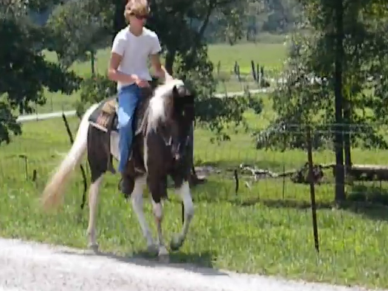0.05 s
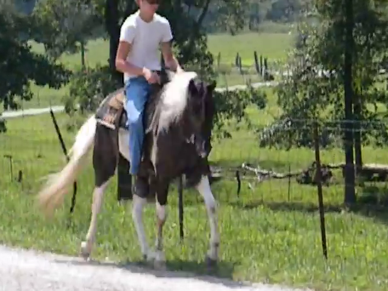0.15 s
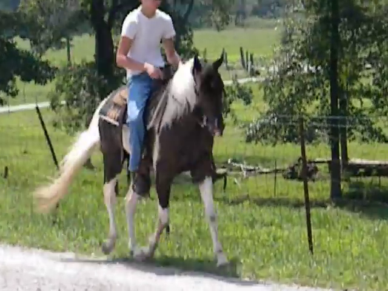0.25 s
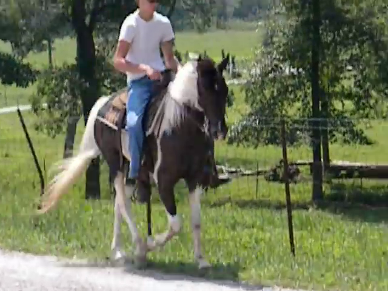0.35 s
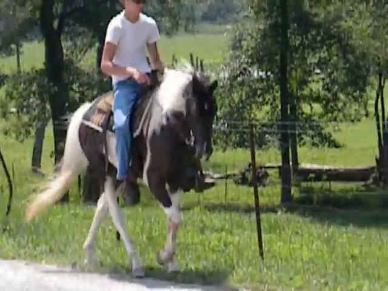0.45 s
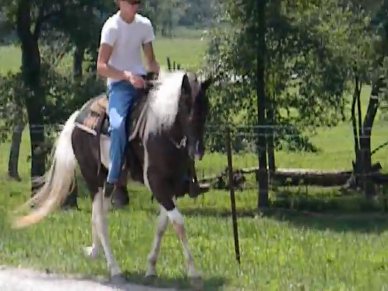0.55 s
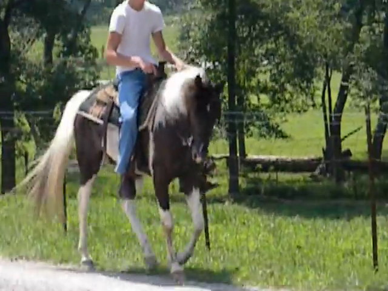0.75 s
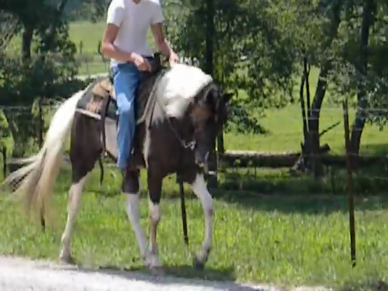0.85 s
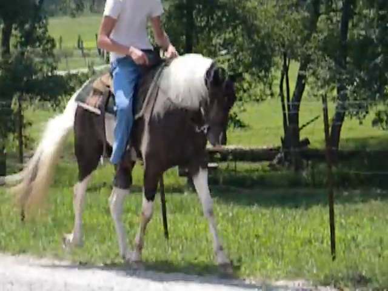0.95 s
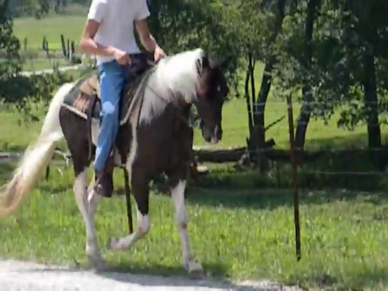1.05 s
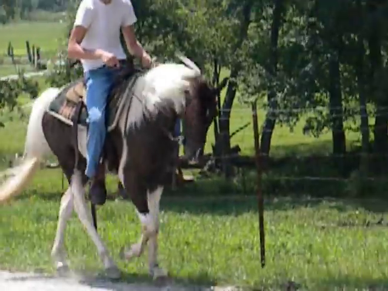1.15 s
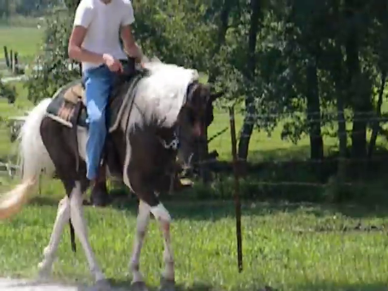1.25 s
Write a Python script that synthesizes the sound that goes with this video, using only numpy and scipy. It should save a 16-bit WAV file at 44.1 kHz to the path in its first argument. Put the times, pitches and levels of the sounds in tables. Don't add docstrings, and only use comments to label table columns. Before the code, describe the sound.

Outdoors, small hoof taps on stones lead into a sharp overloaded plastic crack against the camera casing, then the sound ducks briefly and soft hoof crunches continue under light wind hiss and faint motor hum.

```python
import sys
import numpy as np
from scipy import signal
from scipy.fft import rfft, irfft, next_fast_len
from scipy.io import wavfile
from scipy.ndimage import uniform_filter1d, map_coordinates

SR = 44100
rng = np.random.default_rng(int(sys.argv[2]) if len(sys.argv) > 2 else 0)


def unload_wav(signal):
    wavfile.write(
        sys.argv[1],
        SR,
        np.round(np.clip(np.atleast_2d(signal).T, -1, 1) * 32767).astype(np.int16),
    )


def undo_db(level):
    steps = np.asarray(level, float) / 20
    return 10 ** steps


N = 57330


def unit(x):
    return x / np.sqrt(np.mean(x ** 2) + 1e-20)


def wobble(rate):
    knots = rng.standard_normal(int(N * 40 / SR) + 9)
    return map_coordinates(knots, [np.arange(N) * min(rate, 40) / SR])


def filtered(x, response):
    m = next_fast_len(N + 8192)
    return irfft(rfft(x, m) * response(np.fft.rfftfreq(m, 1 / SR)), m)[..., :N]


def above(x, cut_hz):
    def response(hz):
        section = 1j * hz / (cut_hz + 1j * hz * 1.612 - hz ** 2 / cut_hz) * 1j * hz / cut_hz
        return section ** 2
    return filtered(x, response)


def rush(points, patchy_db):
    z = signal.stft(rng.standard_normal(N), nperseg=512)[2]
    patches = uniform_filter1d(rng.standard_normal(z.shape), size=6, axis=0)
    patches = uniform_filter1d(patches, size=8, axis=1)
    noise = signal.istft(z * undo_db(patchy_db * unit(patches)), nperseg=512)[1][:N]
    f, db = np.transpose(points)
    return unit(filtered(noise, lambda hz: undo_db(np.interp(np.log(hz + 1), np.log(f + 1), db))))


def ring(s, db, hz, t60, attack_s):
    s, db, hz, t60 = [np.asarray(v, float)[:, None] for v in (s, db, hz, t60)]
    at = np.ceil(s * SR).astype(int) + np.arange(SR // 12)
    t = at / SR - s
    decay = undo_db(db - 60 * t / t60)
    wave = decay * np.sin(2 * np.pi * hz * t) * (1 - np.exp(-t / attack_s))
    return np.bincount(at.ravel(), wave.ravel(), N + SR)[:N]


def wind():
    # f/Hz, level per Hz/dB
    leaves = [(150, -37), (260, -2.5), (466, -7), (910, -9.5), (989, -7), (1080, -8), (1260, -8),
              (3420, -9), (4500, -15.5), (5850, -59), (9900, -120)]
    # f/Hz, level per Hz/dB
    rumble = [(12, -37), (20, -15.5), (32, -28.5), (118, -9), (150, -5), (200, -42), (330, -120)]
    patchy_db = .6
    gusts_db = .35 * (wobble(1.1) + wobble(14))
    hiss_points = [(110, -29.5), (170, leaves[1][1])] + list(leaves[1:])
    hiss = undo_db(-41.5 + gusts_db) * rush(hiss_points, patchy_db)
    return hiss + undo_db(-57.5 + 1.1 * wobble(4.9)) * rush(rumble, patchy_db)


def motor():
    # t/s, level/dB
    load = [(0, -3.5), (.12, -4.5), (.25, -7.5), (.4, -1), (.62, -3), (.85, -1.5), (1.0, -1.5), (1.05, -2),
            (1.3, -1.5)]
    hum_hz, hum_db, overtone_db, skirt_db = 194.5, -37.5, -22, -18
    turns_per_s, turn_peak_s, turn_depth = 10.3, .832, 0.24
    t = np.arange(N) / SR
    phase = 2 * np.pi * np.cumsum(hum_hz + 0.14 * wobble(5.2)) / SR
    turn = 1 + turn_depth * np.cos(2 * np.pi * turns_per_s * (t - turn_peak_s))
    swell = turn * undo_db(1.14 * wobble(25))
    tone = np.sin(phase) + undo_db(overtone_db) * np.sin(2 * phase)
    skirt = unit(filtered(rng.standard_normal(N), lambda hz: 1 / (1 + ((hz - hum_hz) / 25) ** 2)))
    level = undo_db(hum_db + np.interp(t, *np.transpose(load)))
    return level * (np.sqrt(2) * swell * tone + undo_db(skirt_db) * skirt)


def hooves():
    # t/s, peak level/dB, f/Hz, t60/s
    taps = [(.1092, -15, 1100, 0.0051), (0.1454, -14.5, 730, 0.0087), (.146, -20, 1180, 0.012),
            (0.145, -20, 1800, 0.0025), (.147, -17.5, 3385, 0.011), (.2125, -14.5, 1514, .005),
            (0.2126, -30.5, 2690, .02), (.318, -28.5, 857, 0.019), (0.5347, -16.5, 2670, 0.0041),
            (.5395, -22, 2220, 0.0061), (.683, -30.5, 337, .07), (.99, -30.5, 597, 0.026),
            (1.063, -21.5, 328, 0.009), (1.189, -28, 458, 0.022), (1.2845, -14, 2300, 0.0016),
            (1.212, -26.5, 880, 0.016), (0.321, -33.5, 445, 0.039), (.47, -51.5, 256, .04),
            (1.235, -41.5, 536, 0.24), (.8272, -24.5, 2950, .009), (1.189, -31, 810, 0.033),
            (1.203, -31, 1065, 0.073)]
    # start t/s, length/s, level/dB, centre f/Hz
    crunches = [(0.1, 0.026, -40, 1730), (0.13, 0.0082, -44.5, 2600), (0.203, 0.067, -36.5, 1900),
                (0.305, .03, -44, 2184), (0.447, 0.039, -52, 1740), (0.67, 0.028, -39.5, 1900),
                (0.825, .016, -38.5, 2450), (0.852, 0.017, -35, 2200), (0.862, 0.049, -45, 2720),
                (0.973, 0.016, -44, 2870), (1.187, 0.017, -35, 1800), (1.203, .022, -38.5, 1600),
                (1.284, 0.0068, -30.5, 3140), (0.537, 0.0046, -34.5, 2260)]
    grit_db, width_octaves, rise = 5, .75, .2
    out = ring(*np.transpose(taps), 0.00017)
    t = np.arange(N) / SR
    for start, length, db, centre_hz in crunches:
        grains = unit(uniform_filter1d(rng.standard_normal(N), size=40))
        grit = rng.standard_normal(N) * undo_db(grit_db * grains)
        push = np.interp((t - start) / length, [0, rise, .7, 1], [0, 1, .7, 0])
        burst = filtered(
            grit * push,
            lambda hz: np.exp(-.5 * (np.log2((hz + 1) / centre_hz) / width_octaves) ** 2))
        out = out + undo_db(db) * burst * np.sqrt(length * SR / np.sum(burst ** 2))
    return above(out, 160)


def snap():
    contact_s = [
        .2346,
        .23648,
        .24024,
        .2465,
    ]
    contact_db = [
        -0.5,
        -16,
        -24,
        -38.5,
    ]
    mode_hz = [1110, 1290, 1500, 1760, 2130, 2640, 2820, 3210, 3500]
    # level/dB, t60/s
    modes = [(-0.5, 0.014), (3.5, .012), (-4.5, .011), (-12.5, 0.0048), (-7.5, 0.019), (0, 0.019),
             (-4, 0.011), (-10, 0.031), (-9, 0.023)]
    rows = []
    for s, db in zip(contact_s, contact_db):
        for hz, (level, t60) in zip(mode_hz, modes):
            rows.append((s, db + level, hz, t60))
    casing = above(ring(*np.transpose(rows), attack_s=0.001), 1124)
    thud = ring([contact_s[0]], [-28.5], [380], [.02], attack_s=.0012)
    return casing + above(thud, 260)


def scene():
    return (wind() + motor() + hooves() + undo_db(6.5) * snap())[None]


def top_cut(x):
    return signal.sosfilt(signal.butter(12, 4740, fs=SR, output="sos"), x)


def record(dry):
    # t/s, level/dB
    gain = [(0, 2), (.055, -2), (.075, -3.5), (.1, 0.5), (.2, 0.5), (.236, 0.5), (.243, -8.5), (.285, -5),
            (.32, -0.5), (.42, 0), (1.3, -0.5)]
    top_hz, edge_hz = 4102, 120
    overload_level, hardness, offset = 1.0, 30, -.0039

    def narrow(hz):
        slope = np.clip((hz - top_hz) / edge_hz, -40, 40)
        return 1 / (1 + np.exp(slope)) * (hz < 4600)

    s, db = np.transpose(gain)
    x = dry * undo_db(np.interp(np.arange(N) / SR, s, db))
    x = filtered(x, narrow)
    x = x / (1 + np.abs(x / overload_level) ** hardness) ** (1 / hardness) + offset
    return top_cut(x)


dry = scene()
out = record(dry)
unload_wav(out)
```